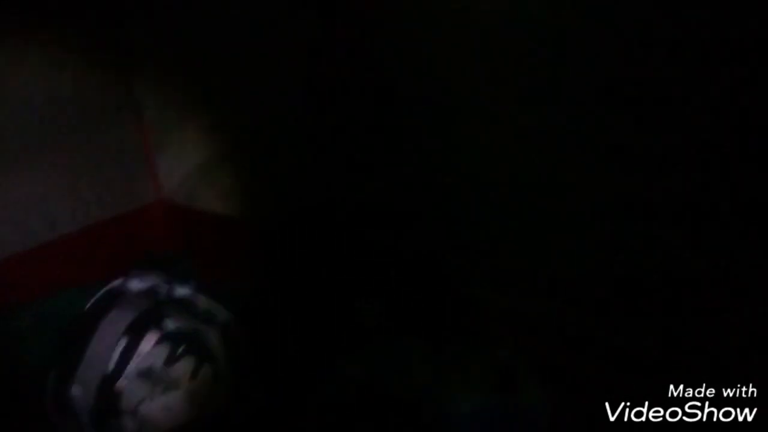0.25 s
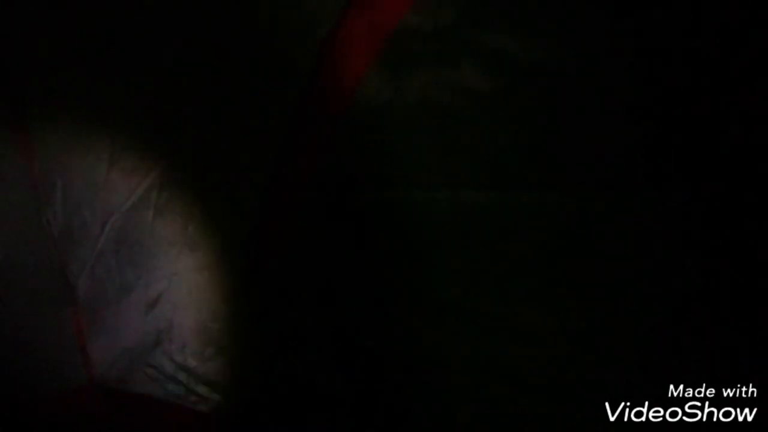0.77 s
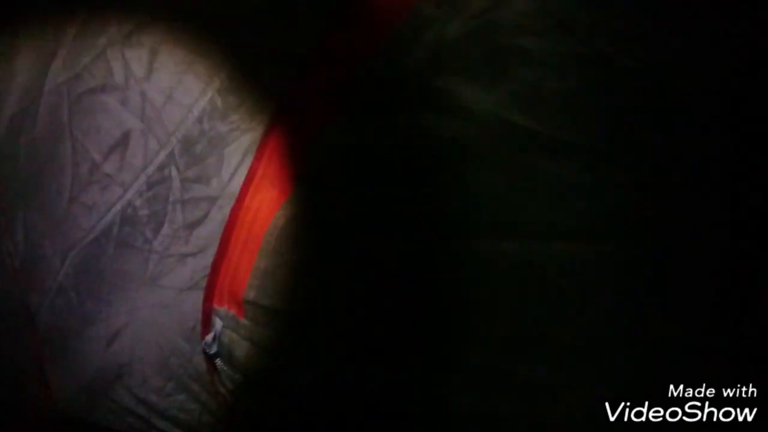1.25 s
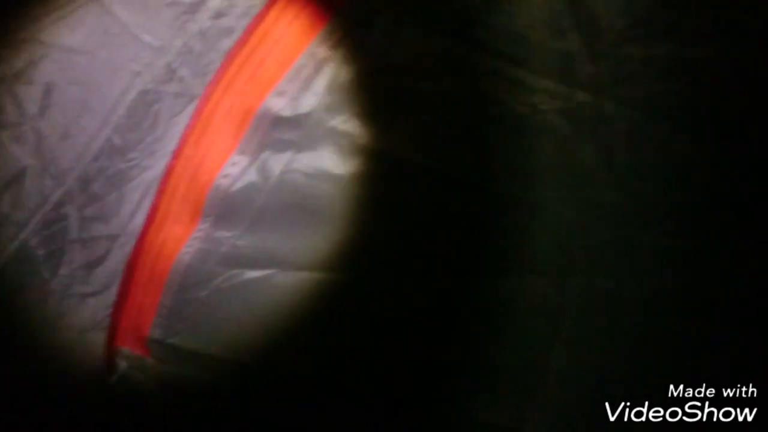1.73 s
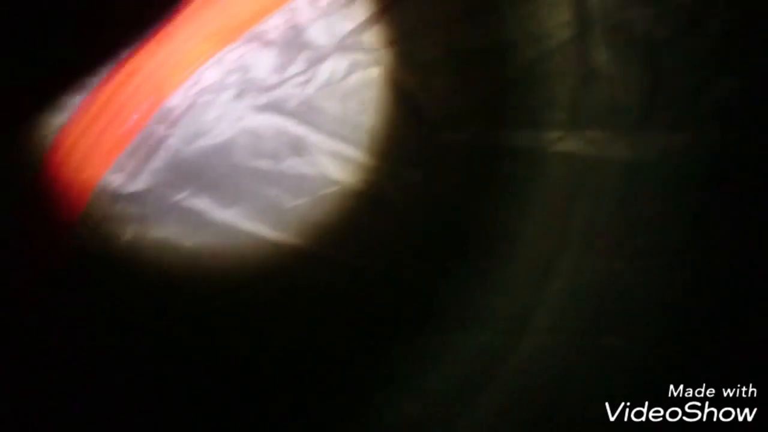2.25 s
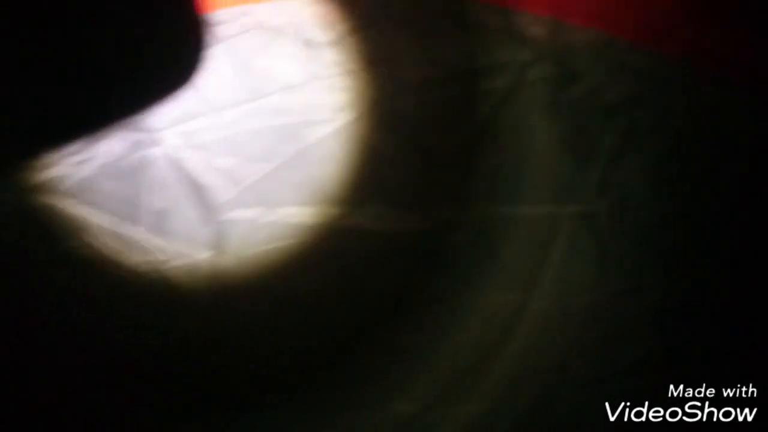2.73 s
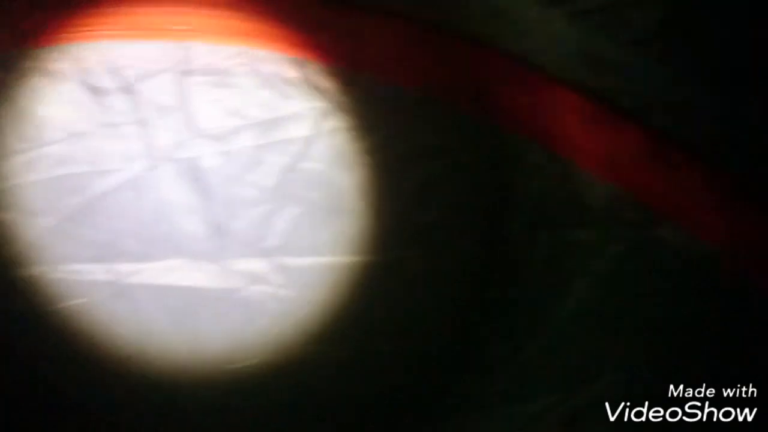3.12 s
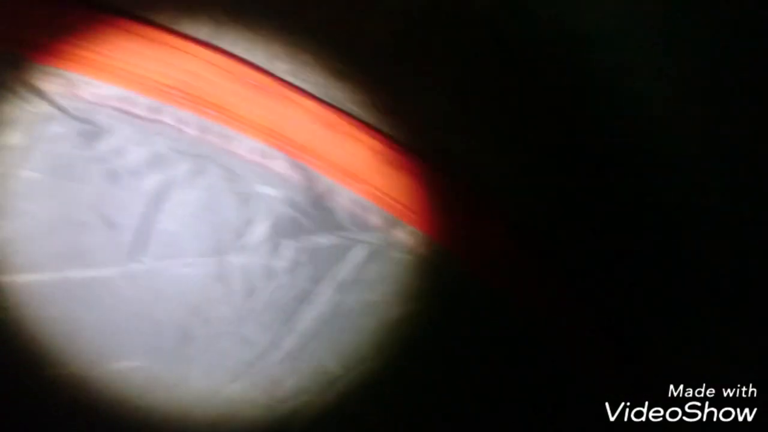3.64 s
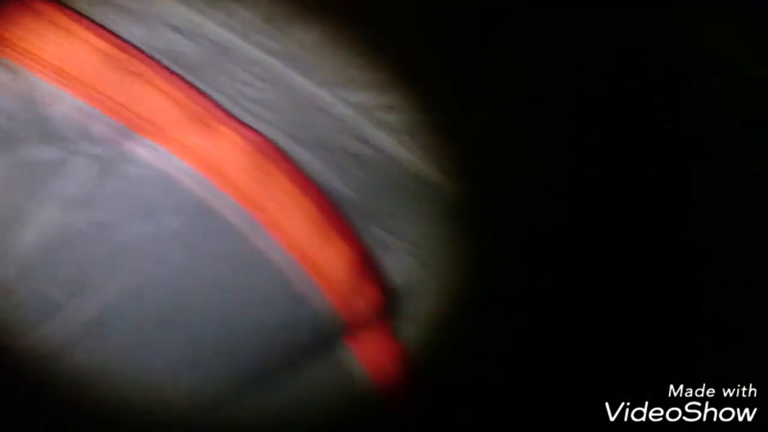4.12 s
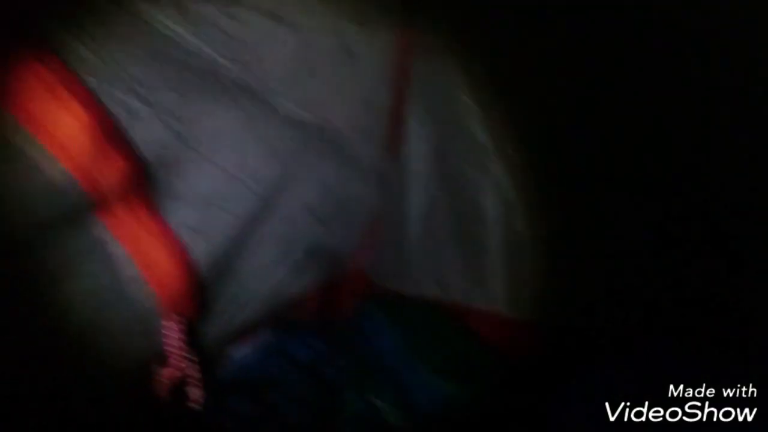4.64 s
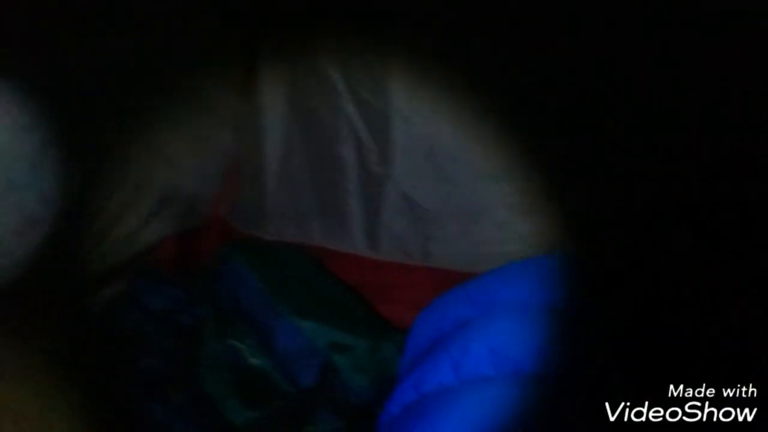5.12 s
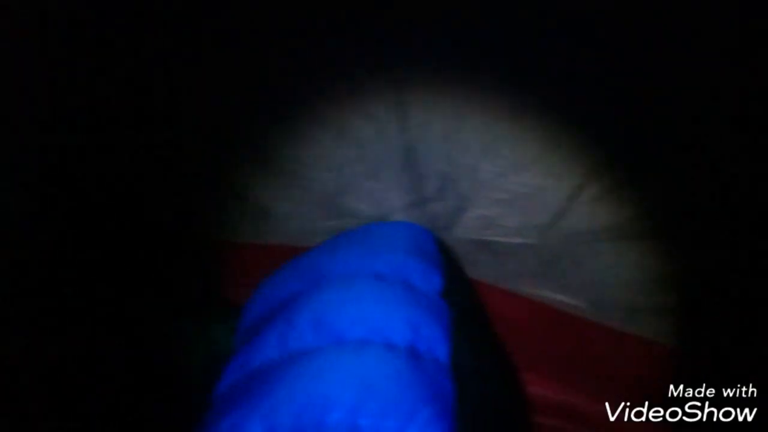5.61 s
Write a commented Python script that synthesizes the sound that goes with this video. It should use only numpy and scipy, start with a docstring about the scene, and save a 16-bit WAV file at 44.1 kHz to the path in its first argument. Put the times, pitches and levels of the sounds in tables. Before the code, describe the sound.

Heavy rain patters on a tent from start to finish, heard from inside on a hand-held phone. Thousands of tiny slaps on taut fabric merge into a crisp, crinkly wash, with quick flurries of ticks from the roof. Fat drops land irregularly just overhead, several each second, with sharper ones at about 1.2, 1.8, 2.7, 3.8 and 4.5 seconds. The shower eases a little after the first second and is lightest between about 1.5 and 3.2 seconds. From around 3.5 seconds it thickens and grows louder, reaching its heaviest at about 5.5 seconds and staying there to the end. A very faint high hiss flickers above the drops, and a few barely audible hollow blips lie beneath them in the first 3.5 seconds. The sound is bright, with weak bass that briefly drops out, and the left side is muffled.

```python
"""Heavy rain pattering on a tent, heard from inside; it eases, then thickens over the last two seconds.
Each drop slaps taut fabric, which crinkles and rings for a few milliseconds. Thousands merge into the
patter; fat drops stand out overhead. A faint, very high hiss flickers above; soft blips lie far below.
A hand-held phone picks it up: the left microphone is muffled, and the faint bass drops out at moments."""
import sys
import numpy as np
from scipy import signal
from scipy.fft import rfft, irfft
from scipy.io import wavfile

SR = 44100
rng = np.random.default_rng(int(sys.argv[2]) if len(sys.argv) > 2 else 0)


def generate_wav(sig):
    """Save sig (samples, or channels by samples) to the path in sys.argv[1] as 16-bit PCM at SR."""
    pcm = np.round(np.clip(np.atleast_2d(sig).T, -1, 1) * 32767).astype(np.int16)
    wavfile.write(sys.argv[1], SR, pcm)


N = 258867

# Shower strength: time_s, level_db
SHOWER_CURVE = [(0.01, -26.5), (0.07, -29), (0.25, -28.0), (0.34, -28.5), (0.58, -27.5), (0.7, -30),
                (0.76, -29), (0.85, -30.6), (0.91, -28), (1.03, -30.5), (1.12, -27), (1.24, -30.5),
                (1.3, -28.5), (1.42, -31.5), (1.9, -29.5), (1.96, -31), (2.2, -30), (2.26, -32.5),
                (2.44, -30), (2.62, -31), (2.74, -30), (2.92, -32.5), (2.98, -30), (3.19, -32),
                (3.25, -30.0), (3.46, -29.5), (3.49, -28.0), (3.7, -29.5), (3.76, -27.5), (3.94, -27.5),
                (4.05, -26), (4.17, -24.5), (4.48, -25), (4.54, -23.5), (4.6, -26), (4.72, -23.5),
                (4.87, -23.5), (5.38, -23), (5.47, -21.0), (5.6, -22.0), (5.7, -22.9), (5.86, -22.4)]
# Fat drops overhead: start_s, level_db, ring_hz, ring_q, snap_db, thud_db, crinkle_ms, splash_db
OVERHEAD_DROPS = [(0.0369, -22.0, 4560, 1.2, -3, 9, 1.0, -12), (0.1021, -23.5, 2000, 0.5, 3, 3, 0.6, -12),
                  (0.2083, -25.5, 2000, 1.2, 9, 0, 1.5, -12), (0.2329, -25.0, 3710, 3.0, -3, 0, 0.6, -6),
                  (0.2437, -25.0, 3710, 3.0, 3, 0, 1.2, -12), (0.2954, -24.5, 2000, 0.8, 0, 0, 0.4, -12),
                  (0.3145, -24.0, 4260, 5.0, 9, 6, 1.2, -12), (0.4139, -20.0, 3700, 0.7, -3, 6, 1.1, -11),
                  (0.4391, -20, 3400, 0.5, 3, 9, 0.6, -2), (0.4457, -23.5, 5600, 0.8, 0, 6, 1.5, -12),
                  (0.485, -21.0, 3230, 5.0, -3, 3, 0.4, -12), (0.5041, -25.5, 3020, 3.0, 6, 0, 0.4, -12),
                  (0.5744, -22.5, 2820, 3.0, 3, 6, 1.0, -6), (0.6011, -24.0, 5230, 5.0, -3, 3, 0.9, -6),
                  (0.6084, -23.5, 2820, 1.2, -3, 0, 0.4, -12), (0.7422, -25.5, 4560, 3.0, 0, 9, 1.1, -6),
                  (0.7984, -22.5, 3710, 2.0, 6, 0, 0.9, -10), (0.9099, -22.0, 2140, 3.0, 9, 6, 0.4, -6),
                  (0.9507, -23.5, 4260, 3.0, -3, 3, 0.8, -12), (1.055, -23.5, 2000, 0.5, 3, 0, 0.9, -6),
                  (1.0949, -22.5, 3970, 5.0, 3, 6, 0.5, -6), (1.1124, -23.5, 2140, 0.8, 3, 0, 0.9, -6),
                  (1.123, -22.5, 4560, 1.2, 3, 3, 1.4, -8), (1.1889, -17.0, 4150, 4.0, -3, 3, 1.3, -12),
                  (1.3144, -28.0, 4880, 5.0, -3, 6, 0.4, -6), (1.3729, -22.5, 3710, 5.0, 0, 0, 0.9, -6),
                  (1.4359, -25.0, 3230, 3.0, 6, 9, 1.5, -6), (1.4471, -26.0, 3710, 0.8, -3, 0, 1.5, -12),
                  (1.477, -29.0, 2000, 0.8, -3, 9, 0.4, -12), (1.523, -24.0, 3230, 5.0, 0, 0, 0.9, -7),
                  (1.5405, -26.0, 5230, 5.0, -3, 3, 1.2, -6), (1.6127, -23.5, 3460, 1.2, 0, 0, 1.0, -12),
                  (1.6306, -26.0, 3710, 3.0, -3, 6, 0.4, -6), (1.6358, -26.5, 3710, 5.0, 0, 0, 0.4, -6),
                  (1.6476, -27.0, 2140, 2.0, 6, 0, 0.5, -12), (1.7155, -27.0, 2820, 0.8, 3, 9, 0.6, -6),
                  (1.7697, -18.5, 3200, 0.7, -3, 6, 0.8, -12), (1.904, -26.5, 3460, 3.0, -3, 0, 0.5, -6),
                  (1.9209, -26.0, 3970, 3.0, -3, 0, 1.4, -6), (2.0996, -23.5, 4560, 0.8, 3, 6, 1.4, -6),
                  (2.1863, -27.0, 2000, 0.8, -3, 0, 0.6, -6), (2.2099, -25.5, 3460, 0.8, 3, 0, 1.0, -6),
                  (2.2681, -28.5, 3970, 3.0, 3, 6, 0.6, -12), (2.3579, -27.5, 3460, 5.0, 6, 3, 0.6, -12),
                  (2.4574, -23.0, 5230, 0.5, -3, 0, 1.2, -7), (2.505, -27.0, 4880, 0.8, 0, 9, 0.6, -6),
                  (2.5365, -26.0, 2460, 3.0, -3, 9, 0.6, -6), (2.579, -28.0, 2140, 1.2, 9, 6, 0.5, -6),
                  (2.5917, -25.5, 2140, 0.5, 3, 3, 0.9, -12), (2.6166, -25.5, 2820, 0.8, 0, 0, 0.9, -12),
                  (2.6739, -18.5, 5100, 3.5, 3, 0, 1.1, -2), (2.7207, -25.0, 2630, 2.0, -3, 0, 0.8, -12),
                  (2.7832, -23.5, 3000, 0.8, 0, 0, 0.4, -12), (2.9501, -26.5, 2820, 2.0, 3, 0, 0.6, -6),
                  (2.9714, -28.0, 2000, 1.2, 6, 0, 0.4, -12), (3.0042, -27.5, 2460, 5.0, -3, 3, 0.9, -6),
                  (3.032, -21.5, 3230, 0.5, 3, 0, 0.6, -12), (3.0746, -27.0, 3710, 2.0, 0, 3, 0.6, -12),
                  (3.1088, -26.0, 2630, 3.0, 6, 3, 0.9, -6), (3.1594, -24.0, 2290, 0.5, -3, 6, 0.9, -6),
                  (3.2147, -24.5, 4260, 2.0, 0, 0, 0.9, -6), (3.2713, -24.0, 3230, 3.0, -3, 0, 0.8, -12),
                  (3.2909, -26.5, 3710, 5.0, 6, 6, 0.4, -6), (3.3189, -26.0, 3970, 5.0, 0, 0, 0.8, -12),
                  (3.3998, -19, 3970, 2, 3, 0, 1, -6), (3.4964, -23.0, 4260, 2.0, -3, 0, 0.4, -6),
                  (3.5656, -20, 4200, 2, 0, 3, 1, -8), (3.5912, -23.0, 4260, 0.5, -3, 3, 0.8, -12),
                  (3.6203, -24.5, 2400, 0.5, 3, 6, 0.6, -12), (3.6593, -22.5, 2140, 0.5, -3, 0, 1.2, -6),
                  (3.7616, -16.5, 4260, 6, 0, 0, 1.3, -6), (3.7721, -22.5, 2630, 0.5, 6, 0, 1.4, -12),
                  (3.8044, -25.5, 2630, 3.0, 6, 9, 0.4, -6), (3.8775, -23.5, 4880, 1.2, 3, 0, 0.6, -12),
                  (4.0535, -20.5, 2460, 2.0, 3, 6, 0.3, -11), (4.1088, -21.5, 3970, 2.0, 0, 9, 0.3, -12),
                  (4.1402, -20.5, 3970, 3.0, 0, 9, 0.7, -1), (4.2254, -22.5, 4260, 3.0, -3, 0, 0.3, -12),
                  (4.3178, -20.5, 3710, 0.8, 0, 9, 1.2, -1), (4.413, -22.5, 2140, 0.8, 0, 6, 0.7, -12),
                  (4.5297, -18.0, 2630, 0.5, 0, 9, 1.8, -5), (4.6439, -19.5, 3230, 2.0, 3, 0, 1.7, -11),
                  (4.6945, -24.5, 5600, 1.2, 0, 0, 0.3, -6), (5.1057, -19.5, 3970, 5.0, 0, 0, 0.6, -11),
                  (5.1667, -20.5, 3460, 1.2, 0, 0, 0.3, -6), (5.1764, -20.5, 2820, 1.2, -3, 3, 0.5, -12),
                  (5.2478, -20.0, 2820, 1.2, 3, 0, 1.8, -11), (5.5493, -21.5, 3230, 3.0, 0, 9, 0.3, -12),
                  (5.5956, -20.0, 2290, 3.0, 3, 0, 0.3, 0), (5.6123, -19.5, 2290, 3.0, 3, 6, 1.6, -11)]
# Mean spectrum of a drop on the fabric: freq_hz, gain_db
FABRIC_EQ = [(40, -35.5), (200, -23), (500, -14.5), (800, -7), (1300, -5.5), (2100, -0.1), (3100, -1.5),
             (4150, 1.45), (5500, -13), (7600, -16), (9100, -21), (10700, -15), (11700, -22), (12400, -40),
             (15500, -58)]
# Muffled left microphone relative to the right: freq_hz, gain_db
LEFT_MIC_EQ = [(60, -6), (400, -7.5), (900, -14.5), (2200, -24), (4000, -24.5), (4900, -16.5),
               (5500, -11.5), (7000, -0.5), (8000, 2.5), (8900, 6), (9700, -1.5), (10700, -17),
               (13000, -23)]
# Spans where the bass is gated: start_s, end_s
BASS_GATE_SPANS = [(0.0, .045), (.16, .2), (.275, .335), (.68, .88), (.94, 1.03), (1.24, 1.41),
                   (1.49, 1.63), (1.87, 2.05), (2.23, 2.33), (2.4, 2.45), (2.56, 2.63), (2.73, 2.98),
                   (3.1, 3.38), (3.42, 3.53), (3.65, 3.71), (3.91, 3.96)]
# Hollow blips: centre_s, pitch_hz, level_db, left_minus_right_db
HOLLOW_BLIPS = [(.83, 450, -65, -13), (1.32, 467, -65, -9.5), (1.96, 205, -71, 19), (2.84, 497, -60, -12),
                (3.17, 564, -58, -13), (3.31, 477, -60, -12), (3.45, 460, -62, -15)]

SLAP_SAMPLES = 2048
SLAP_BINS_HZ = np.maximum(np.fft.rfftfreq(SLAP_SAMPLES, 1 / SR), 1)
TIME_S = np.arange(N) / SR


def slap(ring_hz, ring_q, click_db, crinkle_s, crinkle_db, echo_db, echo_s=.0082, lag_spread_s=.00018):
    """Stereo spectrum of one drop: impact, crinkle and wall echoes through the fabric's resonance."""
    t = np.arange(SLAP_SAMPLES) / SR
    # crinkle builds while the drop flattens
    crinkle = unit_energy(rng.standard_normal(SLAP_SAMPLES) * np.sqrt(t) * np.exp(-t / crinkle_s))
    echoes = unit_energy(rng.standard_normal((2, SLAP_SAMPLES)) * np.exp(-t / echo_s))
    blow = rfft((t == 0) + undb(crinkle_db) * crinkle + undb(echo_db) * echoes)
    # tension sets the pitch; some bare click gets past
    membrane = 1 / (1 + 1j * ring_q * (SLAP_BINS_HZ / ring_hz - ring_hz / SLAP_BINS_HZ)) + undb(click_db)
    # direction sets the lag between microphones
    lag_s = np.round(SR * lag_spread_s * rng.standard_normal()) / SR
    return blow * membrane * np.exp(-2j * np.pi * SLAP_BINS_HZ * np.maximum([[lag_s], [-lag_s]], 0))


def patter(colour, shower_db, median_per_s, thickening, spread_db, cap_sigma, spot_count=48, **fabric):
    """Drops of all sizes hit slack (low) and taut (high) spots; a stronger shower brings more."""
    rate_per_s = median_per_s * undb(2 * thickening * (shower_db - np.median(shower_db)))
    arrivals = np.cumsum(rate_per_s) / SR
    spots = np.array([slap(hz, **fabric) for hz in np.geomspace(600, 12000, spot_count)])
    spots *= colour / np.sqrt(np.mean(np.abs(spots) ** 2, axis=0))
    out = np.zeros((2, N))
    for spot in irfft(spots)[:, :, :SLAP_SAMPLES // 2]:
        gaps = rng.exponential(size=4096)
        sizes = undb(spread_db * np.minimum(rng.standard_normal(4096), cap_sigma))
        starts = np.searchsorted(arrivals, np.cumsum(gaps) * spot_count)
        blows = np.bincount(starts, sizes, minlength=N)[:N]
        out += signal.oaconvolve(blows[None], spot, axes=1)[:, :N]
    out /= np.sqrt(rate_per_s)
    return out / rms(out[1]) * undb(shower_db)


def fat_drops(colour, drops, attack_s=.004, left_db=-2):
    """Single drops close overhead: a pat on slack fabric, a ringing tick on taut, then a short splash."""
    out = np.zeros((2, N + SLAP_SAMPLES))
    for start_s, level_db, ring_hz, ring_q, snap_db, thud_db, crinkle_ms, splash_db in drops:
        thud = [(302, 0), (597, thud_db), (1030, thud_db), (1900, 0)]  # heavy landing: wide patch moves
        snap = [(4200, 0), (5450, snap_db)]  # hard landing
        crinkle_db = 20 * np.log10(crinkle_ms / .6)  # at 0.6 ms, as strong as the impact
        blow = slap(ring_hz, ring_q, click_db=-15, crinkle_s=crinkle_ms / 1000, crinkle_db=crinkle_db,
                    echo_db=splash_db + max(crinkle_db, 0), echo_s=.014)
        drop = irfft(colour * response(thud + snap) * blow)
        drop /= rms(drop[1, :int(attack_s * SR)])
        start = int(start_s * SR)
        out[:, start:start + SLAP_SAMPLES] += drop * undb(level_db + np.array([[left_db], [0]]))
    return out[:, :N]


def stray_drops(shower_db, rate_per_s=15):
    """Lesser fat drops landing at random, growing with the shower; rows as in OVERHEAD_DROPS."""
    scatter = rng.standard_normal((256, 6)).T
    start_s = np.cumsum(rng.exponential(size=256)) / rate_per_s
    swell_db = np.interp(start_s, TIME_S, shower_db - np.median(shower_db))
    level_db = -31 + swell_db + .8 * scatter[0]
    ring_hz, ring_q = 3420 * 2 ** (.6 * scatter[1]), 2 ** scatter[2]
    snap_db, thud_db = 2.5 * np.abs(scatter[3]), 3 * np.abs(scatter[4])
    crinkle_ms = .7 * 2 ** (.5 * scatter[5])
    splash_db = np.full_like(start_s, -4)
    rows = np.column_stack([start_s, level_db, ring_hz, ring_q, snap_db, thud_db, crinkle_ms, splash_db])
    return rows[start_s < N / SR]


def top_fizz(shower_db, band_hz=(11800, 14500), flicker_db=4, burst_db=-26, decay_s=.012):
    """Faint, very high hiss on the right: flickers on with the listed drops, steadies as rain thickens."""
    specks = rng.standard_normal(N)
    specks *= undb(flicker_db * np.repeat(rng.standard_normal(N // 64 + 1), 64)[:N])
    fizz = signal.sosfilt(signal.butter(4, band_hz, "bandpass", fs=SR, output="sos"), specks)
    start_s, level_db = np.transpose(OVERHEAD_DROPS)[:2]
    triggers = np.bincount((start_s * SR).astype(int), undb(level_db + burst_db) ** 2, minlength=N)
    burst_power = signal.lfilter([1], [1, -np.exp(-2 / (decay_s * SR))], triggers)
    steady_power = undb(-44 + 2.1 * (shower_db - shower_db.max())) ** 2
    return fizz / rms(fizz) * np.sqrt(steady_power + burst_power) * np.array([[0], [1]])


def blips(sigma_s=.017):
    """Soft hollow tones swell and fade under the patter, slightly unsteady in pitch."""
    warped_s = np.cumsum(1 + .03 * wander(40)) / SR
    out = np.zeros((2, N))
    for centre_s, pitch_hz, level_db, pan_db in HOLLOW_BLIPS:
        swell = np.exp(-((TIME_S - centre_s) / sigma_s) ** 2 / 2)
        gains = undb(level_db + np.array([[pan_db], [-pan_db]]) / 2)
        out += gains * swell * np.sin(2 * np.pi * pitch_hz * warped_s)
    return out


def bass_gate(x, edges_hz=(330, 500), fade_s=.02):
    """A gate shuts on the bass in the listed spans; the lower the pitch, the higher its threshold."""
    frames = dict(nperseg=2048, noverlap=1792)
    hz, t, bins = signal.stft(x, SR, **frames)
    shut = sum(np.clip(.5 + np.minimum(t - start_s, end_s - t) / fade_s, 0, 1)
               for start_s, end_s in BASS_GATE_SPANS)
    for side, edge_hz in enumerate(edges_hz):
        magnitude = np.abs(bins[side])
        edge_median = np.median(magnitude[np.searchsorted(hz, edge_hz)])
        threshold = edge_median * np.outer(edge_hz / np.maximum(hz, 20), shut) ** 4
        bins[side] *= magnitude ** 6 / (magnitude ** 6 + threshold ** 6 + 1e-60)
    return signal.istft(bins, SR, **frames)[1][:, :N]


def response(points):
    """Minimum-phase response through (freq_hz, gain_db) points."""
    hz, db = np.transpose(points)
    cepstrum = irfft(np.log(undb(np.interp(np.log(SLAP_BINS_HZ), np.log(hz), db))))
    cepstrum[1:SLAP_SAMPLES // 2] *= 2
    cepstrum[SLAP_SAMPLES // 2 + 1:] = 0
    return np.exp(rfft(cepstrum))


def wander(rate_hz):
    """Smooth random drift, spread near 1."""
    return np.interp(TIME_S * rate_hz, np.arange(1024), rng.standard_normal(1024))


def undb(db):
    """Decibels to gain."""
    return 10 ** (np.asarray(db) / 20)


def rms(x):
    """Root mean square."""
    return np.sqrt(np.mean(x ** 2))


def unit_energy(x):
    """Scale each row to energy 1."""
    return x / np.sqrt(np.sum(x ** 2, axis=-1, keepdims=True))


def scene():
    """Roof, walls and fat drops at two microphones of opposite polarity, plus the high fizz."""
    colour = response(FABRIC_EQ) * np.array([-response(LEFT_MIC_EQ), np.ones_like(SLAP_BINS_HZ)])
    shower_db = np.interp(TIME_S, *np.transpose(SHOWER_CURVE))
    # near roof: separate ticks in quick flurries
    flurry_db = shower_db + .8 * wander(40)
    roof = patter(colour, flurry_db, median_per_s=560, thickening=.85, spread_db=6, cap_sigma=.85,
                  ring_q=1.36, click_db=-21, crinkle_s=.00065, crinkle_db=-3, echo_db=.5)
    # farther walls: dense patter
    far_db = shower_db + .08 * (shower_db - np.median(shower_db))
    walls = patter(colour, far_db, median_per_s=3500, thickening=.8, spread_db=3.5, cap_sigma=2.24,
                   ring_q=2, click_db=-14.5, crinkle_s=.00081, crinkle_db=0, echo_db=7.5)
    overhead = fat_drops(colour, OVERHEAD_DROPS) + fat_drops(colour, stray_drops(shower_db))
    return undb(-4) * roof + undb(-3) * walls + overhead + top_fizz(shower_db)


def record(dry):
    """The phone rounds peaks and cuts the top treble; in between, the bass is gated and blips join."""
    ceiling, cutoff_hz = .74, 15600
    rounded = ceiling * np.tanh(dry / ceiling)
    lowpass = signal.ellip(10, .2, 80, cutoff_hz, fs=SR, output="sos")
    return signal.sosfilt(lowpass, bass_gate(rounded) + blips())


dry = scene()
out = record(dry)
generate_wav(out)
```